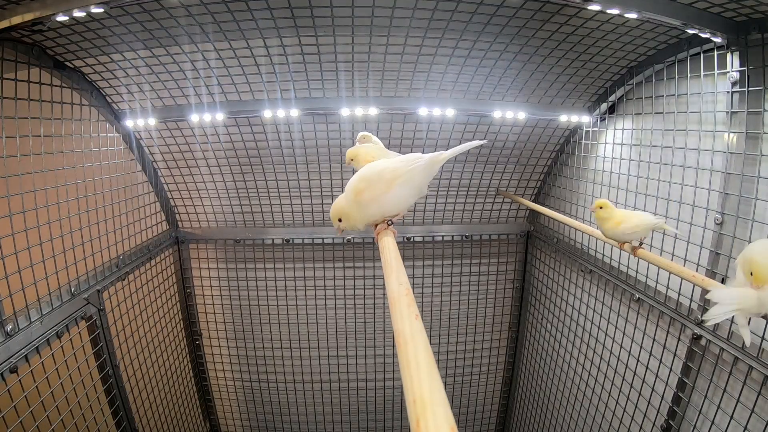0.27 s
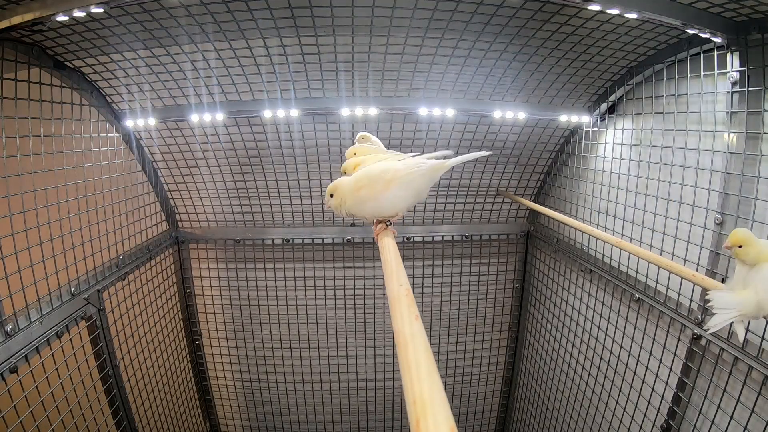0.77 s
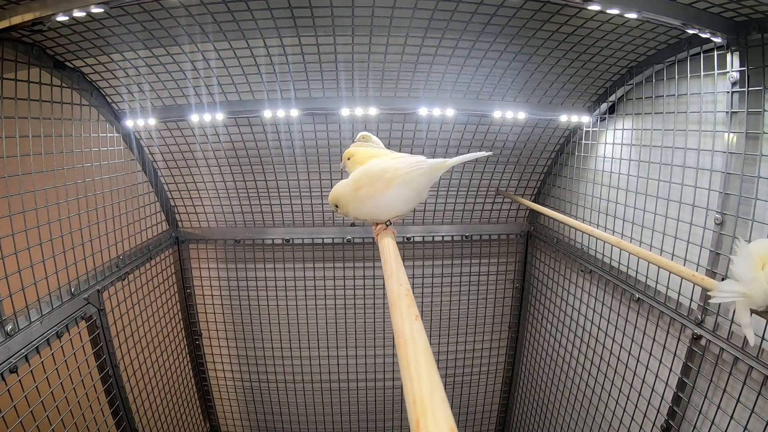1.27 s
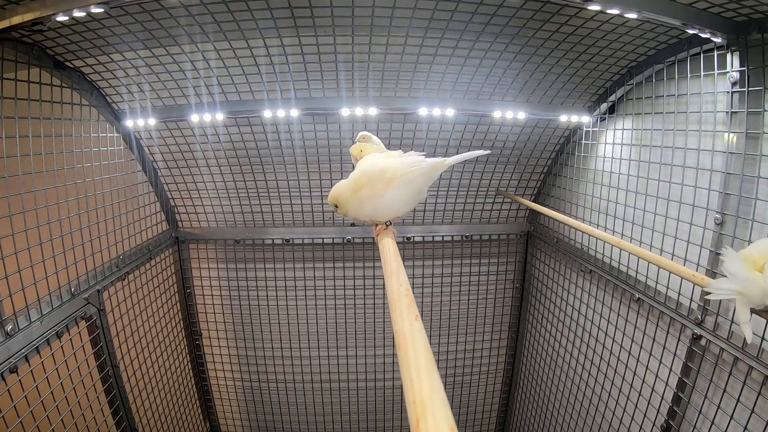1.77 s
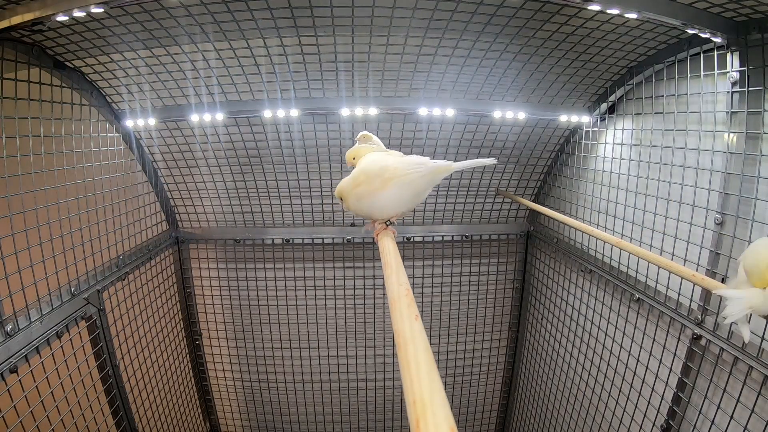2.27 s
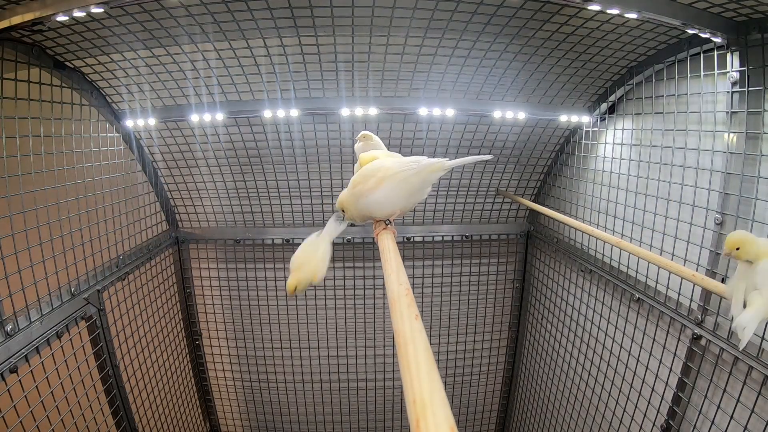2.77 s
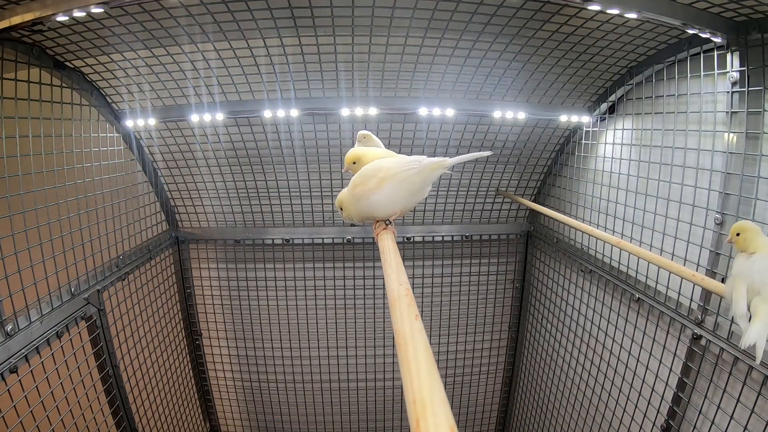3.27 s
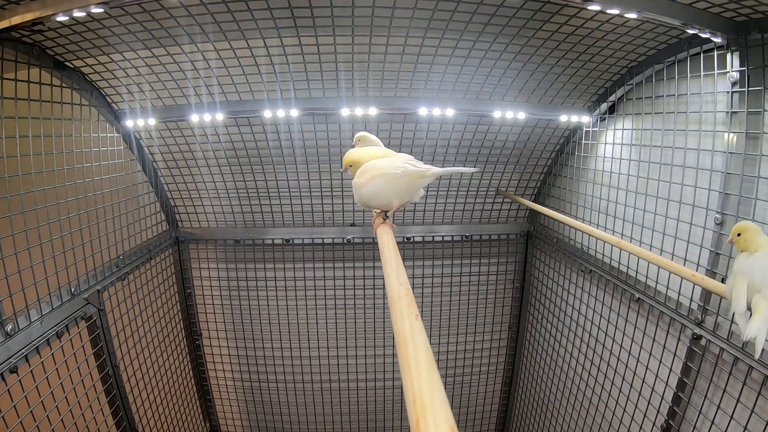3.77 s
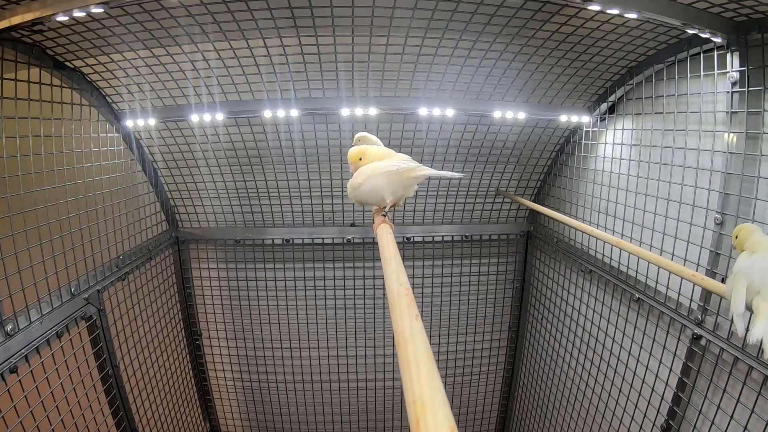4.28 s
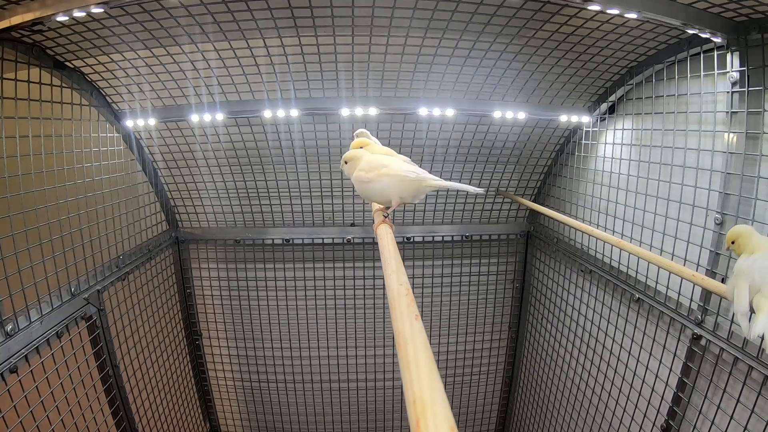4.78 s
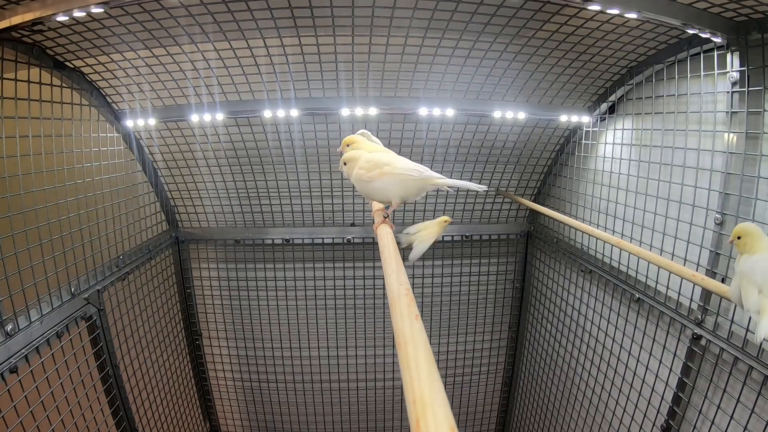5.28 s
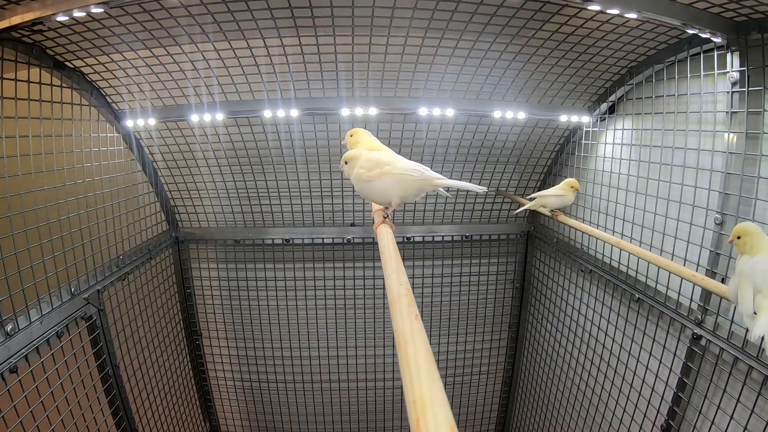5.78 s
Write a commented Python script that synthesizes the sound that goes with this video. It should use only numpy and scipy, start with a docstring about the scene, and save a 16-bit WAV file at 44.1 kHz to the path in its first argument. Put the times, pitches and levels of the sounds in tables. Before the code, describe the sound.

Close hollow perch knocks and scrabbling claws, two short falling chirps, then whirring wingbeats and tinkling cage wires in a small hard room with a low fan hum.

```python
"""Small hard-walled room: canaries in a wire cage, heard from a microphone fixed to their wooden perch.
Feet knock on perches (decaying modes) and rattle the mesh (noise through resonances); toes rub as they settle.
Wingbeats excite air modes and swell filtered noise; wings flick; claws tick on wires and tugs make them chatter.
One bird gives two quick falling chirps (swept sines); a fan drones softly (noise, narrow resonance).
"""
import sys
import numpy as np
from scipy import signal
from scipy.fft import rfft, irfft, next_fast_len
from scipy.io import wavfile
from scipy.ndimage import uniform_filter1d

SR = 44100
rng = np.random.default_rng(int(sys.argv[2]) if len(sys.argv) > 2 else 0)


def materialize(psi):
    """Save the field psi as 16-bit PCM at rate SR to the path in sys.argv[1].

    A 1-D psi becomes a single channel; in a 2-D psi each row is a channel.
    """
    bounded = np.clip(np.atleast_2d(psi).T, -1, 1)
    quanta = np.round(bounded * 32767).astype(np.int16)
    wavfile.write(sys.argv[1], SR, quanta)


N = 266011
TIME = np.arange(N) / SR

# Levels and right/left gains in the tables are relative: the playing functions add trims and pan.


def from_db(db):
    """Decibels to gain."""
    return 10 ** (np.asarray(db) / 20)


def rms_one(x):
    """Scale to unit rms."""
    return x / np.sqrt(np.mean(x ** 2) + 1e-20)


def at_hz(points, hz):
    """Read a table on a log-frequency axis."""
    table = np.array(points)
    return np.interp(np.log(np.maximum(hz, 1)), np.log(table[:, 0]), table[:, 1])


def clicks(times_s, levels_db):
    """One impulse per event."""
    out = np.zeros(N)
    np.add.at(out, (np.asarray(times_s) * SR).astype(int), from_db(levels_db))
    return out


def fade(x, decay_s):
    """Each impulse becomes an exponential decay of the same height."""
    return signal.lfilter([1], [1, -np.exp(-1 / (decay_s * SR))], x + 1e-18)


def surges(times_s, levels_db, decay_s, rise_s):
    """Gain over time: each event swells quickly and dies away; overlaps add in power."""
    power = fade(clicks(times_s, 2 * np.asarray(levels_db)), decay_s / 2)
    return np.sqrt(fade(power, rise_s) / (rise_s * SR))


def convolve(x, response):
    """Pass a sound through a stereo response."""
    return signal.fftconvolve(np.atleast_2d(x), response, axes=1)[:, :N]


def resonate(x, hz, width_hz):
    """Two-pole resonance with gain 1 on top."""
    r = np.exp(-np.pi * width_hz / SR)
    zeros = np.array([1, 0, -1]) * (1 - r * r) / 2
    poles = [1, -2 * r * np.cos(2 * np.pi * hz / SR), r * r]
    return signal.lfilter(zeros, poles, x + 1e-18)


# left-right correlation of noise: f/Hz, correlation [-1..1]
STEREO_CORRELATION = [(60, 0.41), (200, 0.37), (700, 0), (1300, 0.32), (2500, 0.6), (6000, 0.29),
                      (12000, 0)]


def noise(colour, grain_db=0):
    """Coloured stereo noise of rms 1; grain makes it a crowd of uneven tiny snaps."""
    size = next_fast_len(N)
    hz = np.arange(size // 2 + 1) * SR / size
    snaps = np.minimum(rng.exponential(1, size // 32 + 1), 5)
    grain = from_db(grain_db * np.repeat(snaps, 32)[:size])
    mid, side = rfft(rng.standard_normal((2, size)) * grain) * from_db(at_hz(colour, hz))
    alike = np.clip(at_hz(STEREO_CORRELATION, hz), -1, 1)
    spectrum = np.sqrt(1 + alike) * mid + np.sqrt(1 - alike) * side * [[1], [-1]]
    return rms_one(irfft(spectrum, size)[:, :N])


def struck(force, modes, rise_s):
    """Decaying modes with a short build-up; a negative right gain moves the two ports in opposite senses."""
    t = TIME[:SR]
    rings = 0
    for hz, db, t60_s, right_gain in modes:
        ring = from_db(db - 60 * t / t60_s) * np.sin(2 * np.pi * hz * t)
        rings = rings + ring * np.array([[1], [right_gain]])
    return convolve(force, rings * (1 - np.exp(-t / rise_s)))


def wires_ring(force, modes):
    """Parallel resonances of alternating sign, response scaled to unit energy."""
    impulse = signal.unit_impulse(SR // 4)
    response = 0
    for k, (hz, width_hz, db) in enumerate(modes):
        response = response + from_db(db) * resonate(impulse, hz, width_hz) * (-1) ** k
    return convolve(force, response[None] / np.linalg.norm(response))


# room decay: f/Hz, t60/s
ROOM_DECAY = [(150, 0.93), (1300, 0.56), (3000, 0.48), (7000, 0.53), (14000, 0.65)]


def room(x, wet_db):
    """Add a diffuse tail that dies away band by band."""
    t, edges_hz = TIME[:SR * 3 // 4], np.geomspace(100, 16000, 9)
    white, tail = rng.standard_normal((2, 2, len(t))), 0
    for k, band_hz in enumerate(zip(edges_hz, edges_hz[1:])):
        band_filter = signal.butter(2, band_hz, "band", fs=SR, output="sos")
        hiss = signal.sosfilt(band_filter, white[k % 2])
        t60_s = at_hz(ROOM_DECAY, np.sqrt(np.prod(band_hz)))
        tail = tail + hiss * from_db(-60 * t / t60_s)
    tail = tail * (1 - np.exp(-t / 0.0022))
    return x + from_db(wet_db) * convolve(x, tail / np.linalg.norm(tail[0]))


# knocks on the microphone's perch, mostly from feet, some from nearby wing flicks: t/s, knock level/dB, mesh
# rattle level/dB
NEAR_HOPS = [(0.6444, -24.5, -38), (0.6754, -29, -47), (0.7283, -31, -46.5), (0.7773, -26.5, -51.5),
             (1.6605, -34.5, -56), (1.867, -30, -44), (1.8975, -37.5, -62), (1.945, -34.5, -51.5),
             (1.972, -34, -70), (2.042, -37.5, -47.5), (2.076, -30.5, -47), (2.1006, -31, -52.5),
             (2.435, -51, -59), (2.665, -51, -63.5), (2.696, -33.5, -59), (2.8144, -40, -55),
             (3.703, -41, -55.5), (3.745, -41, -60), (3.787, -40, -64), (4.023, -34, -49.5),
             (4.2697, -45.5, -65), (4.7759, -32.5, -48), (4.8029, -30.5, -50)]
# feet on the far perch: t/s, knock level/dB, mesh rattle level/dB
FAR_PERCH_HOPS = [(0.005, -57, -80), (0.273, -55, -62), (0.392, -54.5, -60), (0.4471, -49.5, -56),
                  (5.62, -33, -51.5), (5.678, -41.5, -48), (5.866, -39, -54.5)]
# jolts that shake the whole perch, from landings and from one call: t/s, level/dB
PERCH_SHAKES = [(0.647, -38), (0.690, -34.5), (0.781, -33.5), (0.984, -50.5), (2.434, -51.5),
                (2.7, -51.5), (5.62, -49.5)]
# microphone's perch and mount: f/Hz, level/dB, t60/s, right/left gain
MOUNT_MODES = [(150, -30, 0.85, 0.053), (198, -23, 0.75, -1.6), (340, -28, 0.41, 0.11),
               (502, -24, 0.5, -0.38), (726, -26.5, 0.33, -0.041), (1230, -3.5, 0.15, -1.02),
               (1267, 2, 0.46, -0.41), (1308, 3.5, 0.17, -0.614), (1384, -2.5, 0.13, -0.16)]
# far perch: f/Hz, level/dB, t60/s, right/left gain
FAR_PERCH_MODES = [(478, -21.5, 0.39, 1), (695, -16.5, 0.49, 0.64), (1280, 9, 0.29, -0.4),
                   (1360, 3.5, 0.15, -0.082), (1443, 3.5, 0.045, 0.23), (1826, -4.5, 0.11, 0.28),
                   (2020, -3, 0.06, -0.04)]
# bending of the perch: f/Hz, level/dB, t60/s, right/left gain
BENDING_MODES = [(93.3, -7, 0.57, -3.5), (112, -4.5, 0.17, -1), (128.5, -15, 0.53, -4),
                 (157.6, -13.5, 1, -2.5), (191.6, -19.5, 1, -4), (308, -27, 0.58, -3)]
# mount under steady rubbing: f/Hz, width/Hz, level/dB
MOUNT_RUB_MODES = [(328, 25, -9.5), (736, 29, -25), (1256, 18.4, 7), (1310, 69, 3.5), (1420, 86, -31),
                   (1870, 170, -27)]


def perches(shuffle_db=-27, port_gain=-0.81, bend_db=2, right_db=3.0):
    """Knocks on both perches, feet rubbing the near one, and its slow bending after a jolt."""
    feet = hops(NEAR_HOPS, MOUNT_MODES) + hops(FAR_PERCH_HOPS, FAR_PERCH_MODES)
    rub = settling() * noise(CRACK_SPECTRUM, grain_db=4)[0]
    shuffle = from_db(shuffle_db) * wires_ring(rub, MOUNT_RUB_MODES) * np.array([[1], [port_gain]])
    jolts = clicks(*np.transpose(PERCH_SHAKES))
    bend = from_db(bend_db) * struck(jolts, BENDING_MODES, rise_s=0.0011)
    return (feet + shuffle) * from_db([[-right_db], [right_db]]) + bend


# mesh resonances: f/Hz, width/Hz, level/dB
MESH_MODES = [(1470, 140, -6.5), (1877, 87, 2), (2050, 110, -3), (2481, 62, 3.5), (2870, 135, 1.5),
              (3160, 180, -2), (3550, 260, -3), (4330, 110, -8), (4610, 165, -8.5), (5750, 150, -15.5),
              (5950, 210, -32), (7160, 380, -19.5), (8350, 99, -20)]
# scratch and rasp spectrum: f/Hz, level/dB per Hz
CRACK_SPECTRUM = [(300, 0.5), (900, -6.5), (1600, 7), (3500, -9), (6000, -10), (10000, -23.5), (15000, -57)]


def hops(rows, perch, knock_db=0, mesh_db=2, crack_db=-1, grip_s=0.0048, click_db=-3):
    """A foot knocks a perch, then its claws close and rattle the mesh."""
    s, knock, rattle = np.transpose(rows)
    wood = from_db(knock_db) * struck(clicks(s, knock), perch, rise_s=0.0021)
    grip = uniform_filter1d(fade(clicks(s, rattle), grip_s), size=60)  # toes close over about 1 ms
    mesh = from_db(mesh_db) * wires_ring(grip * rng.standard_normal((2, N)), MESH_MODES)
    scratch = from_db(crack_db) * grip * noise(CRACK_SPECTRUM, grain_db=1.5)
    first_touch = from_db(click_db) * fade(clicks(s, rattle), 0.00035) * noise(CRACK_SPECTRUM)
    return wood + first_touch + room(mesh + scratch, wet_db=3.0)


# FOLLOWS: share of the knock's dB that the rubbing follows
SETTLE_S, SETTLE_RISE_S, SETTLE_FOLLOWS = 0.057, 0.011, 0.71
# a call presses on the perch like a knock of this strength; feet at rest still rub faintly
CALL_PUSH_DB, RESTING_DB = -43.5, -49


def settling():
    """Strength of the toes' rubbing: it follows every hop and every call."""
    knocks = [row[:2] for row in NEAR_HOPS + FAR_PERCH_HOPS]
    calls = [(row[0], CALL_PUSH_DB) for row in CHIRP_CALLS]
    s, db = np.transpose(knocks + calls)
    return surges(s, SETTLE_FOLLOWS * db, SETTLE_S, SETTLE_RISE_S) + from_db(RESTING_DB)


# deep air modes of the enclosure: f/Hz, level/dB, t60/s, right/left gain
DEEP_AIR_MODES = [(33.7, -15, 0.24, 0.76), (60.8, -5.5, 0.31, 0.91), (81.9, -0.5, 0.23, 0.98),
                  (125, -20, 0.063, 0.68)]
# higher air modes of the enclosure: f/Hz, level/dB, t60/s, right/left gain
HIGH_AIR_MODES = [(169, 1, 0.17, 0.64), (204.7, -1.5, 0.22, 0.73), (333.9, -16, 0.6, 0.51),
                  (360, -25, 0.2, 0.58)]
# standing waves of the enclosure: f/Hz, width/Hz, level/dB
STANDING_WAVES = [(182.5, 9.8, 5.5), (335, 4, 7.5), (362, 34, -6), (556, 24, 4), (587.4, 15, 2.5),
                  (691, 33, 2), (762, 25, 1), (1173, 28, 6)]
# stirred air spectrum: f/Hz, level/dB per Hz
AIR_SPECTRUM = [(65, -0.5), (110, -1), (147, -9.5), (192, -5.5), (261, -18.5), (336, -13), (600, -14),
                (877, -16.5), (1210, -17.5), (5000, -35.5), (6500, -34.5), (11000, -120)]
# feather spectrum, also weights snaps and clinks: f/Hz, level/dB per Hz
FEATHER_SPECTRUM = [(900, -4), (1900, 1.5), (3400, -0.5), (5000, -3.5), (7400, -1.5), (9000, -6),
                    (10500, -6.5), (14000, -6), (15500, -18)]


def wings(pulse_db=1, thud_db=1, air_db=-1, feather_db=-2, sing_db=-14, standing_db=-8, throb=0.44,
          ruffle_db=1.57):
    """Each stroke pushes a pulse of air that booms in the enclosure and swells the whoosh and the rustle."""
    s, deep, high = wingbeats()
    air, feathers = flutters()
    boom = from_db(pulse_db) * struck(clicks(s, deep), DEEP_AIR_MODES, rise_s=0.0038)
    thud = from_db(thud_db) * struck(clicks(s, high), HIGH_AIR_MODES, rise_s=0.0051)
    beat = 1 + throb * fade(clicks(s, 0 * s), 0.022)
    eddies = from_db(air_db) * noise(AIR_SPECTRUM, grain_db=1.5)
    standing = from_db(standing_db) * rms_one(wires_ring(noise(AIR_SPECTRUM), STANDING_WAVES))
    whoosh = air * (eddies + standing)
    catches = rms_one(uniform_filter1d(rng.standard_normal(N), size=400))  # vanes catch and let go
    ruffle = from_db(ruffle_db * catches)
    rustle = from_db(feather_db) * ruffle * noise(FEATHER_SPECTRUM, grain_db=0.3)
    brushed_wires = from_db(sing_db) * wires_ring(rng.standard_normal((2, N)), WIRE_MODES)
    return boom + thud + beat * (whoosh + feathers * (rustle + brushed_wires))


# wingbeat runs: start t/s, end t/s, first period/s, period growth/s per beat, nearest t/s, passing time/s,
# deep pulse level/dB, higher thud level/dB
FLIGHT_RUNS = [(0.46, 0.54, 0.054, 0, 0.59, 0.055, -39, -49),
               (3.003, 3.47, 0.0622, 0.00093, 3.238, 0.13, -31.5, -51.5),
               (3.762, 4.33, 0.058, -0.0025, 4.0, 0.41, -54, -57.5),
               (4.81, 5.37, 0.0455, 0.00072, 4.9, 0.19, -26, -41.5),
               (5.482, 5.58, 0.062, 0, 5.486, 0.022, -35, -38.5)]
# FOLLOWS: share of the passing swell that the thud follows; the first beat is only a half stroke
THUD_FOLLOWS, BEAT_SPREAD_DB, FIRST_BEAT_DB = 0.16, 1.1, -3


def wingbeats(count=16):
    """Beats speed up or slow down evenly, swelling at the nearest pass: times, pulse dB, thud dB."""
    beats, k = [], np.arange(count)
    for start, end, period, growth, nearest, passing, deep, thud in FLIGHT_RUNS:
        s = start + period * k + growth * k * k / 2
        near_db = -20 * np.log10(1 + ((s - nearest) / passing) ** 2)
        uneven_db = BEAT_SPREAD_DB * rng.standard_normal((2, count))
        pulse_db = deep + near_db + FIRST_BEAT_DB * (k == 0) + uneven_db[0]
        thud_db = thud + THUD_FOLLOWS * near_db + uneven_db[1]
        beats.append(np.array([s, pulse_db, thud_db])[:, (s >= start) & (s < end)])
    return np.hstack(beats)


# wing work: start t/s, time to final fall/s, attack/s, sag/dB per s, air level/dB, feather level/dB
FLUTTER_RUNS = [(0.404, 0.17, 0.06, 4, -61, -58), (0.622, 0.11, 0.005, 6, -63, -59.5),
                (2.767, 0.043, 0.04, 16, -72, -54.5), (2.951, 0.58, 0.32, 26.5, -45.5, -52),
                (3.577, 0.24, 0.012, -8, -57.5, -63), (3.78, 0.33, 0.046, 12.5, -55, -57.5),
                (4.246, 0.3, 0.033, 42, -55, -59.5), (4.714, 0.023, 0.0062, 8, -52.5, -46.5),
                (4.732, 0.67, 0.063, 14, -41, -50), (5.454, 0.22, 0.0043, -9, -53.5, -58),
                (5.616, 0.071, 0.019, -1, -47, -53.5), (5.818, 0.018, 0.023, 19, -50.5, -53.5)]
# starts this far below its top; final fall rate is added to the sag
FLUTTER_RISE_DB, FLUTTER_FALL_DB_PER_S = 14, 122


def flutters():
    """Each flutter builds up, sags as the bird moves off, then dies: gains of the air and of the feathers."""
    air, feathers = 0, 0
    for start, length, attack, sag, air_db, feather_db in FLUTTER_RUNS:
        t = TIME - start
        rise_db = -FLUTTER_RISE_DB * np.clip(1 - t / attack, 0, 1)
        sag_db = -sag * np.maximum(t - attack, 0)
        fall_db = -FLUTTER_FALL_DB_PER_S * np.maximum(t - length, 0)
        gain = from_db(rise_db + sag_db + fall_db) * (t > 0)
        air = np.maximum(air, from_db(air_db) * gain)
        feathers = np.maximum(feathers, from_db(feather_db) * gain)
    return air, feathers


# single wing flicks: t/s, level/dB
WING_FLICKS = [(3.174, -50.5), (3.28, -46), (3.566, -48.5), (3.592, -54), (3.703, -51.5), (3.731, -55.5),
               (4.023, -54), (4.775, -44)]


def flicks(flick_db=3, length_s=0.012, rise_s=0.0044):
    """A wing snaps open with a short dull puff."""
    colour = [(200, 0.5), (600, 8.5), (1100, 8.5), (2200, -0.5), (4000, -25), (12000, -15)]  # f/Hz, dB per Hz
    puffs = surges(*np.transpose(WING_FLICKS), length_s, rise_s) * noise(colour, grain_db=2.5)
    return room(from_db(flick_db) * puffs, wet_db=1.0)


# claws and beaks on the wires: t/s, level/dB
WIRE_TICKS = [(0.3424, -58.5), (0.6405, -48.5), (1.3492, -60), (2.135, -60.5), (2.859, -57.5),
              (2.9394, -52.5), (3.635, -54.5), (3.7856, -50.5), (3.8255, -43.5), (3.9557, -41),
              (4.222, -51), (4.266, -45), (4.5102, -54.5), (4.7226, -51), (4.839, -42), (5.767, -48),
              (5.841, -52)]
# single-wire resonances: f/Hz, width/Hz, level/dB
WIRE_MODES = [(3146, 20, 9), (3420, 150, -12), (4330, 32, -9), (5570, 260, -17.5), (6230, 37, 2.5),
              (7050, 56, 7), (8570, 160, 1.5), (8930, 43, 6.5), (10200, 150, -2), (11550, 110, -1)]


def ticks(ring_db=-7, clink_db=-3, snap_db=-4, contact_s=0.0049):
    """Short hard contacts make wires ping."""
    touch = fade(clicks(*np.transpose(WIRE_TICKS)), contact_s)
    ping = from_db(ring_db) * wires_ring(touch * rng.standard_normal((2, N)), WIRE_MODES)
    ping += from_db(clink_db) * clinks(touch * rng.standard_normal(N))
    snaps = from_db(snap_db) * touch * noise(FEATHER_SPECTRUM, grain_db=4)
    return room(ping + snaps, wet_db=0.5)


# tugs at the mesh by a clinging bird: t/s, level/dB
MESH_TUGS = [(3.599, -66.5), (3.82, -51.5), (3.955, -56.5), (4.265, -59), (4.51, -66)]
CHATTER_S = 0.097


def shaken_mesh(shake_db=-6, clink_db=-5, panel_db=-7, per_s=70, spread_db=5):
    """After a tug, wires chatter in a stream of uneven tiny contacts, the panel rings, and it calms down."""
    strength = from_db(spread_db * np.minimum(rng.exponential(1, N), 3))
    contacts = (rng.random(N) < per_s / SR) * strength
    chatter = rms_one(fade(contacts, 0.00041) * rng.standard_normal(N))
    force = surges(*np.transpose(MESH_TUGS), CHATTER_S, rise_s=0.0033) * chatter
    wires = from_db(shake_db) * wires_ring(force, WIRE_MODES)
    panel = from_db(panel_db) * wires_ring(force, MESH_MODES)
    return room(wires + panel + from_db(clink_db) * clinks(force), wet_db=2.5)


def clinks(force, count=84, width_hz=60):
    """Many wires ring, each with its own pitch; every 12 ms each is touched with a new strength."""
    out, block = np.zeros((2, N)), (TIME / .012).astype(int)
    for hz in np.linspace(3600, 13800, count) + rng.uniform(-99, 99, count):
        touched = from_db(4.5 * rng.standard_normal(block[-1] + 1))[block]
        ring = resonate(force * touched, hz, width_hz)
        out += from_db(at_hz(FEATHER_SPECTRUM, hz)) * ring * rng.standard_normal((2, 1))
    return out * np.linalg.norm(force) / np.linalg.norm(out[0])


# chirps: t/s, length/s, start f/Hz, low f/Hz before the slow sink, time to mid-drop/s, level/dB
CHIRP_CALLS = [(0.969, 0.0814, 3644, 1925, 0.0225, -47.5), (1.32, 0.031, 4500, 3085, 0.013, -52)]
CHIRP_STEEPNESS, CHIRP_ATTACK_S, CHIRP_RELEASE_S, CHIRP_SAG_DB_PER_S = 4.98, 0.0088, 0.004, 52
CHIRP_SINK_HZ_PER_S = 2470  # slow sink throughout, on top of the drop


def chirps(chirp_db=-2, waver=0.0623, overtone_db=-24, hiss_db=-13):
    """A hoarse whistle drops fast from a high pitch towards a low one, sinking slowly throughout."""
    out, rasp = np.zeros(N), noise(CRACK_SPECTRUM)[0]
    for start, length, high_hz, low_hz, drop_s, db in CHIRP_CALLS:
        t = np.clip(TIME - start, 0, length)
        drop = 1 / (1 + (t / drop_s) ** CHIRP_STEEPNESS)
        hz = low_hz + (high_hz - low_hz) * drop - CHIRP_SINK_HZ_PER_S * t
        jitter = 1 + waver * rms_one(uniform_filter1d(rng.standard_normal(N), size=30))
        phase = 2 * np.pi * np.cumsum(hz * jitter) / SR
        ramps = np.minimum(t / CHIRP_ATTACK_S, (length - t) / CHIRP_RELEASE_S)
        gain = from_db(db - CHIRP_SAG_DB_PER_S * t) * np.minimum(1, ramps)
        whistle = np.sin(phase) + from_db(overtone_db) * np.sin(2 * phase)
        out += gain * (whistle + from_db(hiss_db) * rasp)
    return room(from_db(chirp_db) * out, wet_db=3)


# fan spectrum: f/Hz, level/dB per Hz
FAN_SPECTRUM = [(25, -8.5), (49, -10), (70, -15.5), (115, -31), (145, -6.5), (195, -4), (245, -23.5),
                (500, -35), (720, -22), (1000, -31), (2200, -39.5), (5500, -45), (7300, -40.5), (8200, -51),
                (10400, -45.5), (15000, -48)]
# width of each of two cascaded resonances
FAN_DB, DRONE_DB, DRONE_HZ, DRONE_STAGE_WIDTH_HZ = -59.5, -62.5, 182.7, 27.4


def fan():
    """Soft airflow noise with a wavering duct drone: noise through two equal narrow resonances."""
    drone = noise(FAN_SPECTRUM)
    for _ in range(2):
        drone = resonate(drone, DRONE_HZ, DRONE_STAGE_WIDTH_HZ)
    return from_db(FAN_DB) * noise(FAN_SPECTRUM) + from_db(DRONE_DB) * rms_one(drone)


def scene(right_db=0.7):
    """Perches, birds a little to the right, fan."""
    birds = ticks() + shaken_mesh() + wings() + flicks() + chirps()
    return perches() + birds * from_db([[-right_db], [right_db]]) + fan()


# microphone treble response: f/Hz, level/dB
MICROPHONE_RESPONSE = [(7000, 0.5), (10700, 0.5), (11500, -10.5), (14000, -13), (15400, -18)]
CUTOFF_HZ = 15400


def record(dry):
    """The microphone dulls the high treble, and the top is cut steeply."""
    size = next_fast_len(N + SR // 10)
    hz = np.arange(size // 2 + 1) * SR / size
    response = from_db(at_hz(MICROPHONE_RESPONSE, hz))
    heard = irfft(rfft(dry, size) * response, size)[:, :N]
    return signal.sosfilt(signal.ellip(10, .1, 80, CUTOFF_HZ, fs=SR, output="sos"), heard)


dry = scene()
out = record(dry)
materialize(out)
```